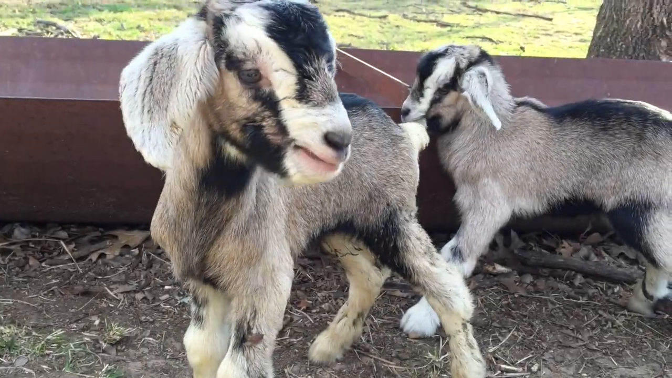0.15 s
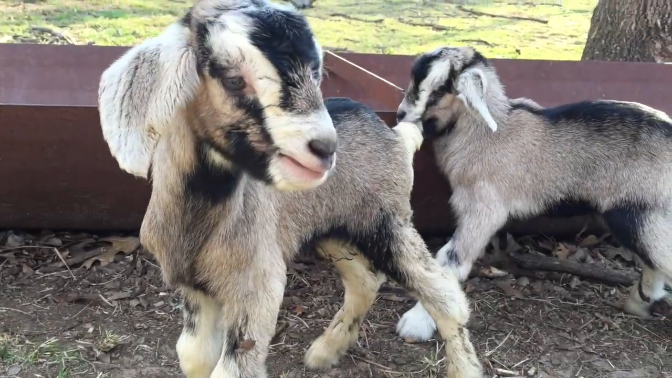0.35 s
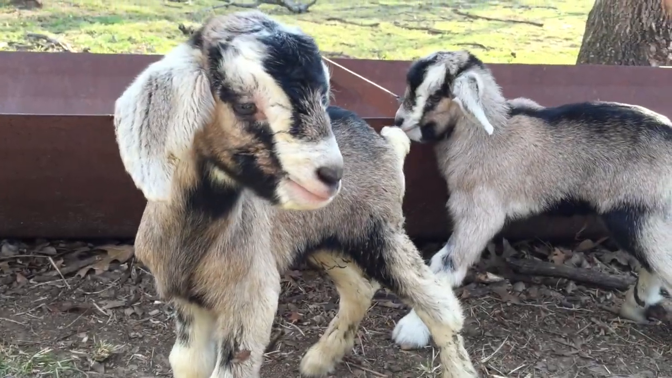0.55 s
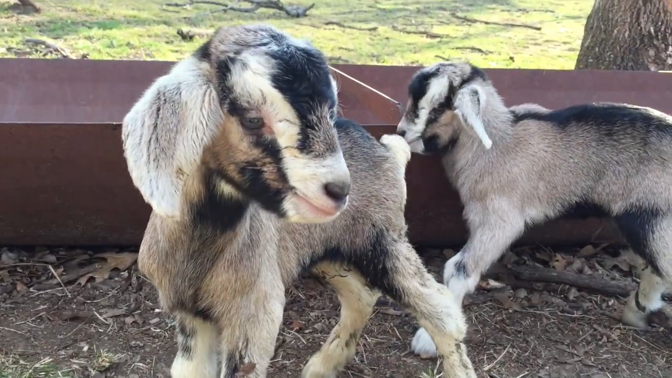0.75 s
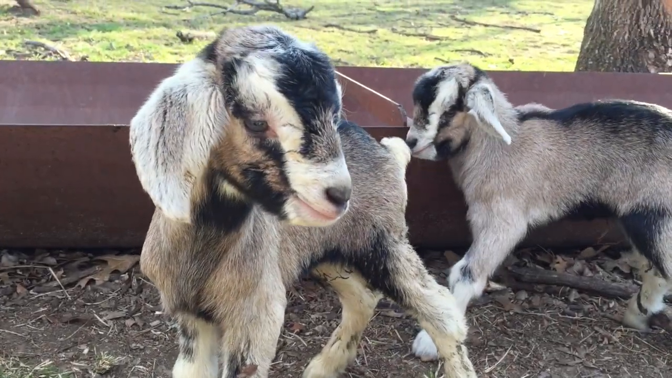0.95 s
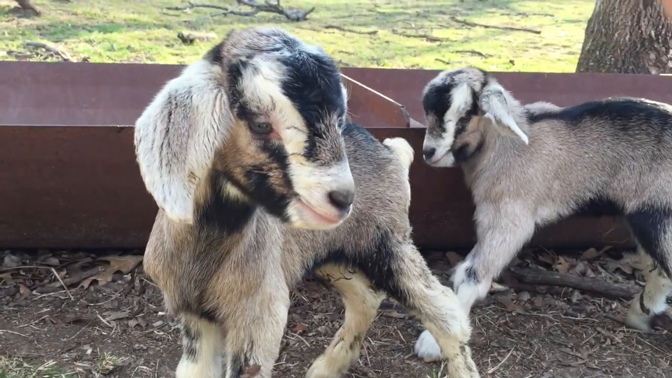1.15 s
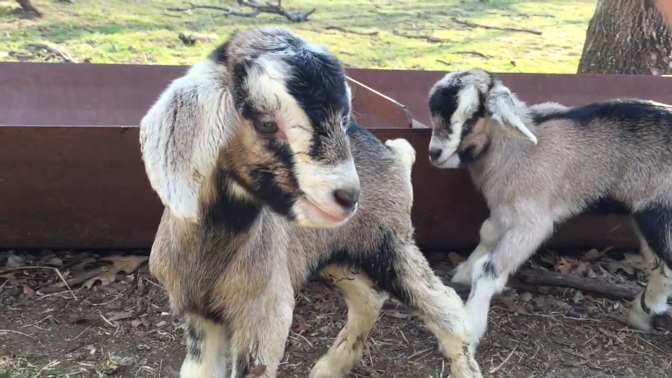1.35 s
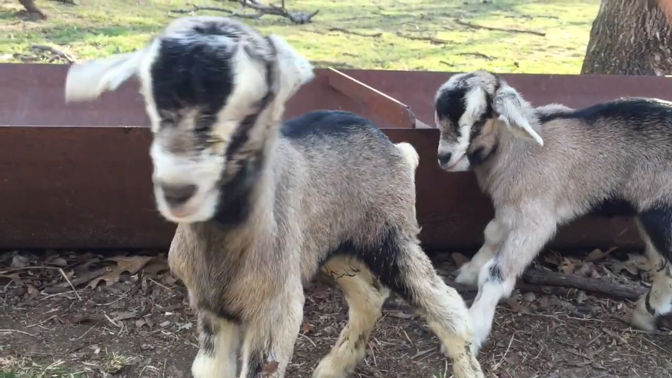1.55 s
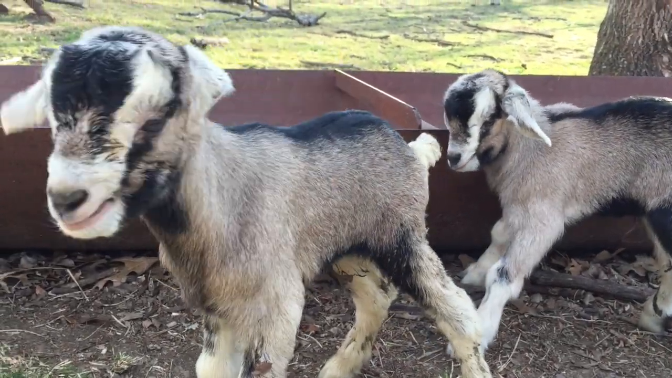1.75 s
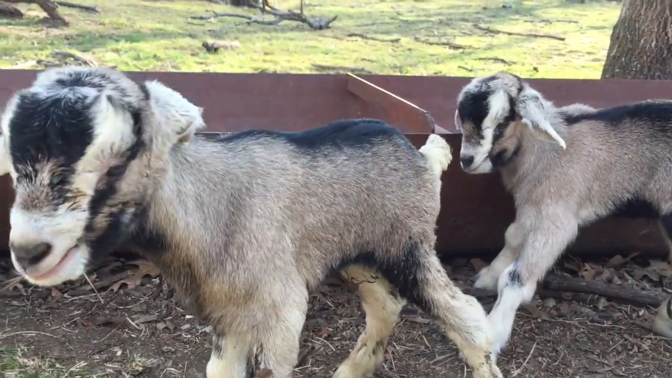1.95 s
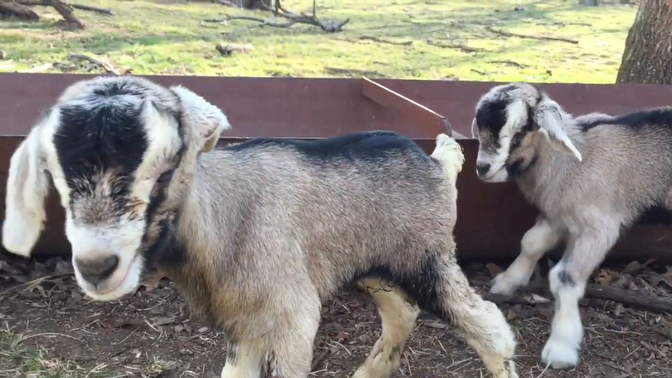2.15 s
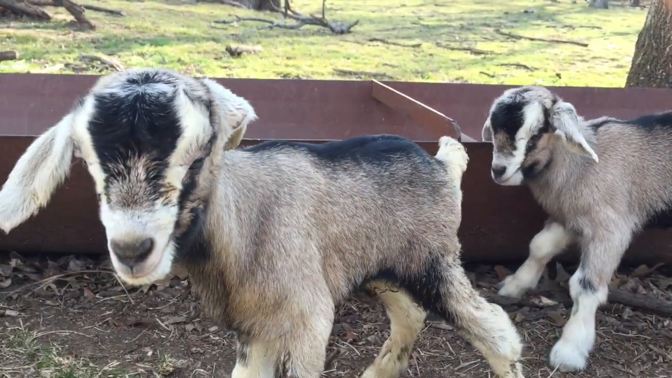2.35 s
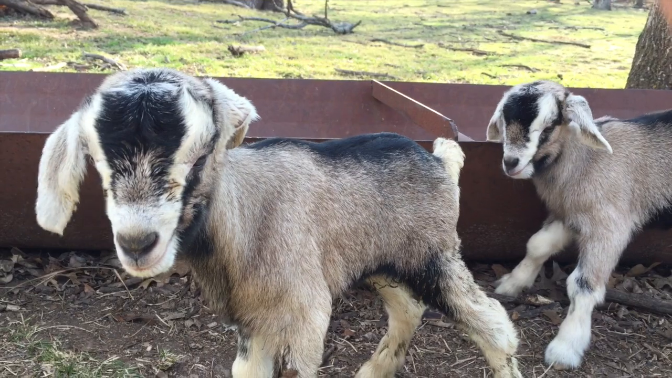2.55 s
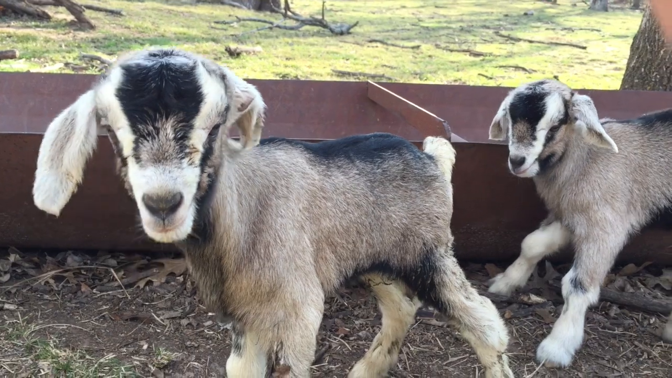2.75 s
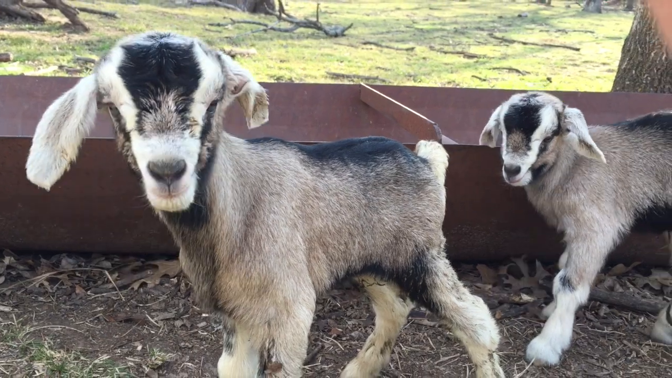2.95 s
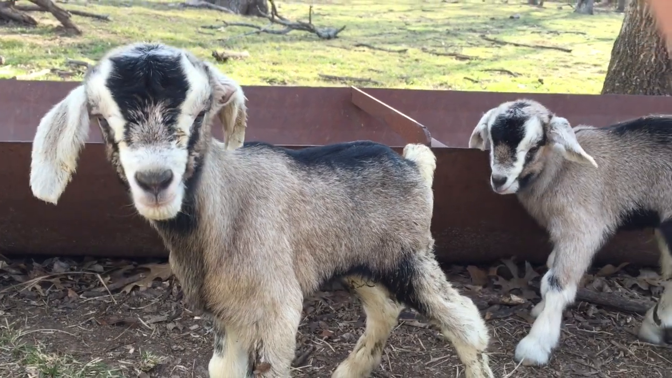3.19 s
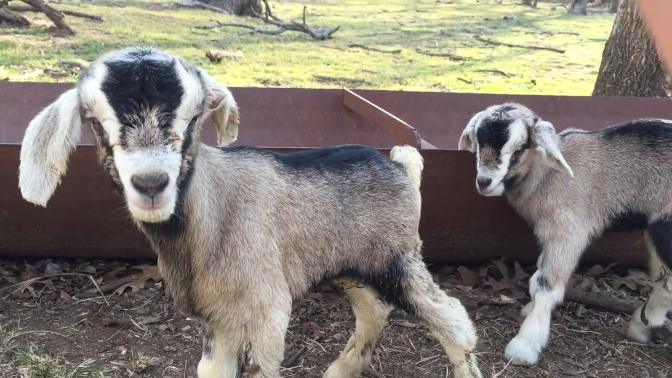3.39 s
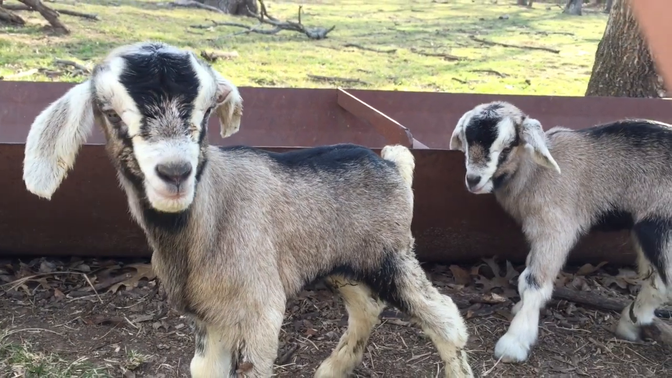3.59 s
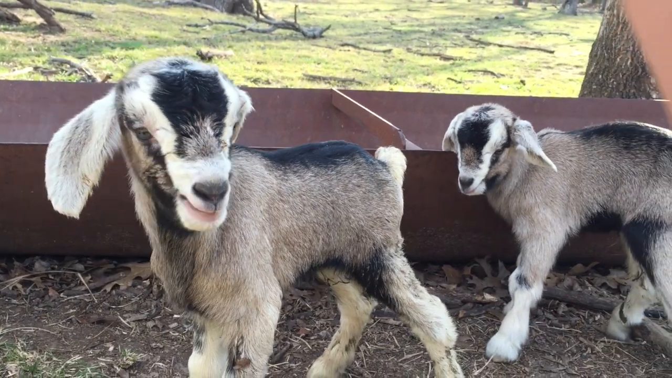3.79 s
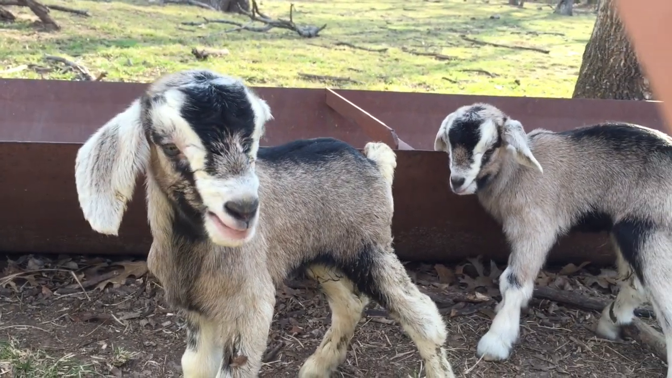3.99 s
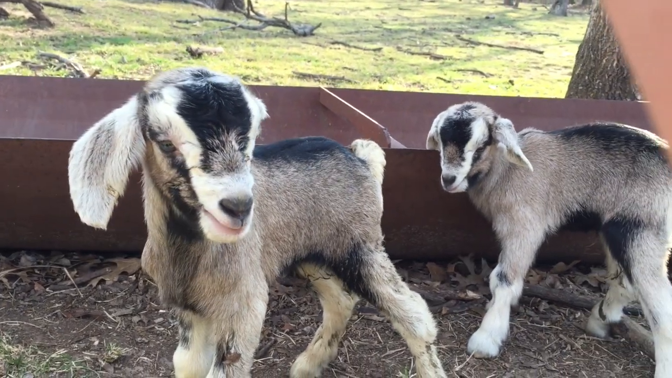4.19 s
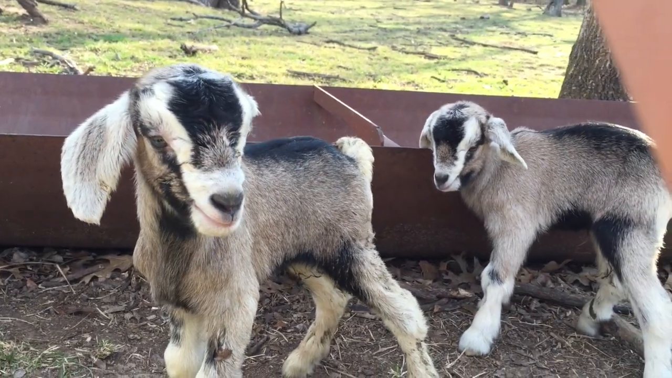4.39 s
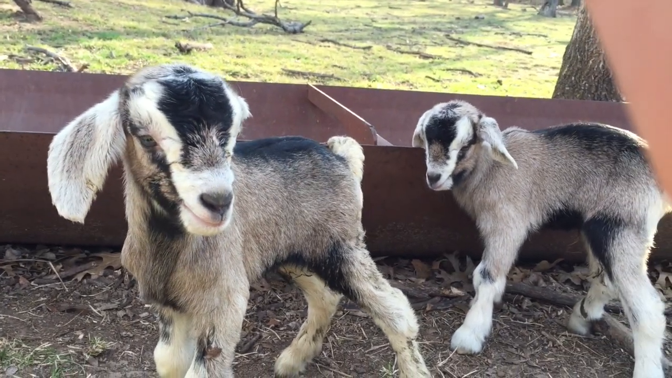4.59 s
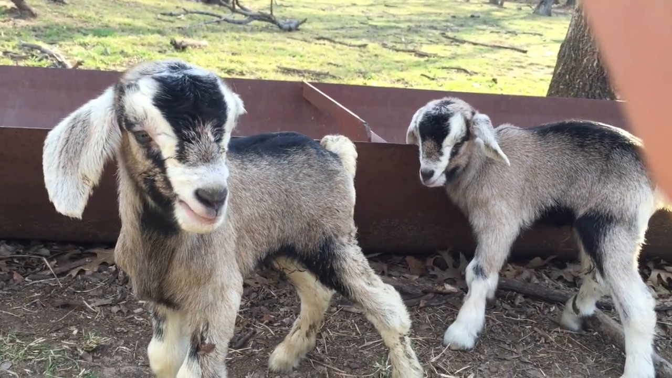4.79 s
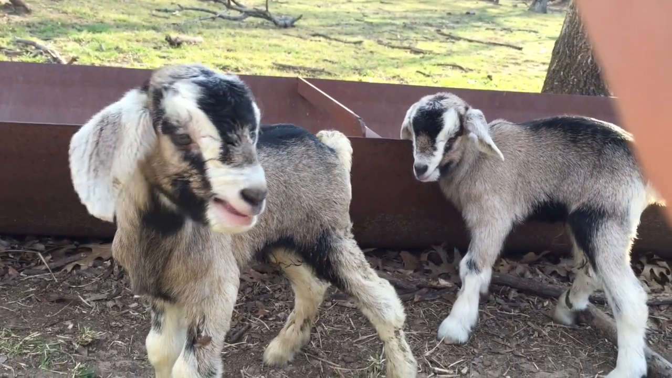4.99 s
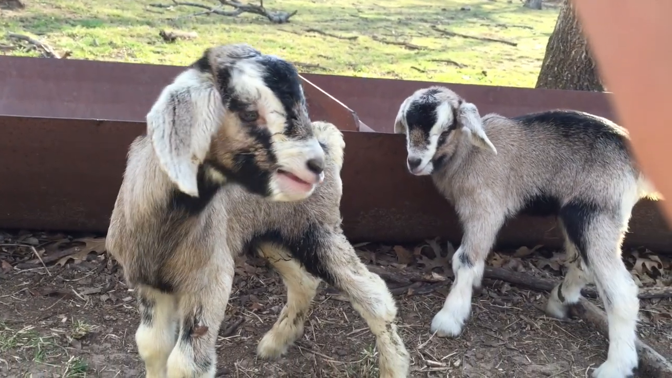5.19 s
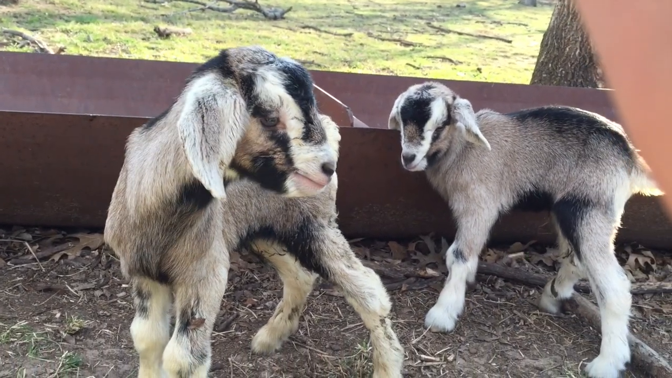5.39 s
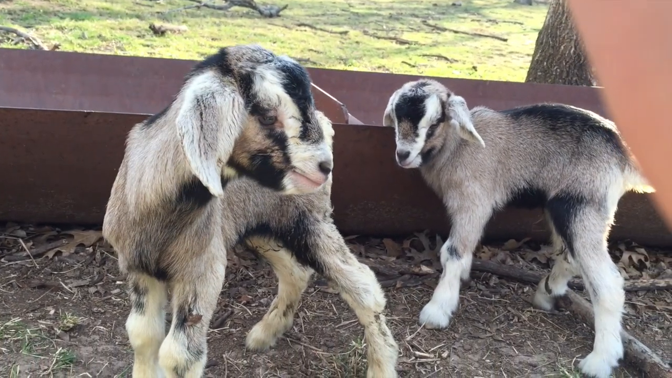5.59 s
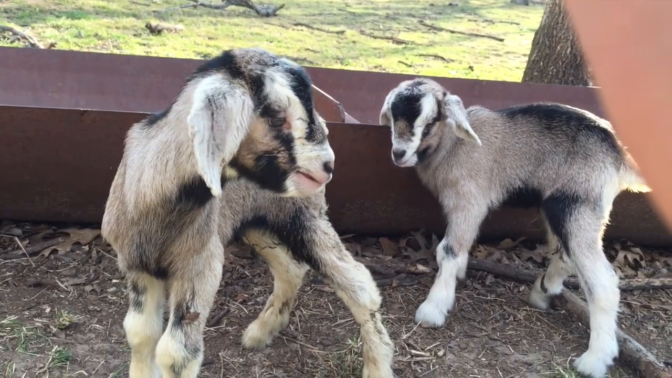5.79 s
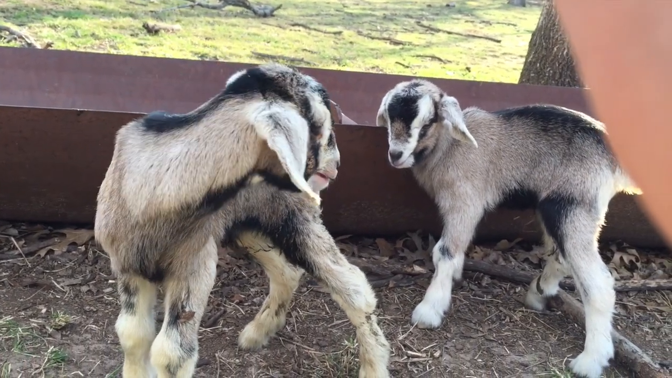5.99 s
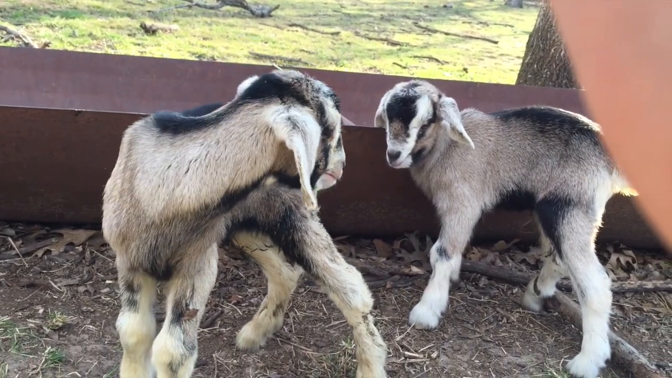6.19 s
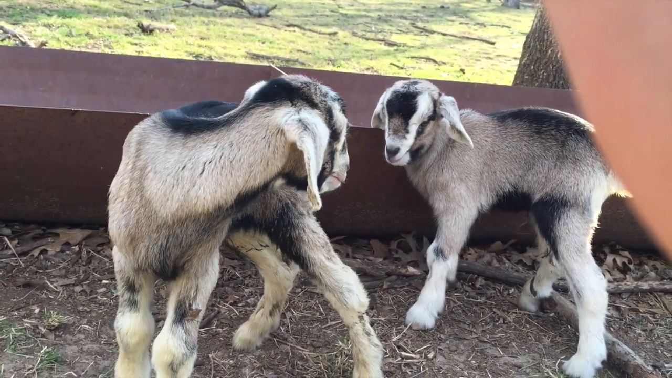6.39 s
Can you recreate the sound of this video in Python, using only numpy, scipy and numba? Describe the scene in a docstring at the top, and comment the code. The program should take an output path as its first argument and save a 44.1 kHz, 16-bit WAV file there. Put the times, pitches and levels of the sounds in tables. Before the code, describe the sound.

A calm open farmyard, close single microphone, faint low background noise throughout. At 0 s a young goat is already bleating nearby, a nasal mid-high cry shaking about ten times a second until 0.45 s. Far off, a clear rooster crows from 0.2 to 0.8 s, ringing on through the yard, while a hoarser one sounds two notes between 0.5 and 1.4 s. A small lip pop opens the second, slightly softer bleat, 1.55 to 2.05 s. Tiny bird chirps follow from 2.1 to 2.5 s, then dry litter crackles under a hoof near 3 s. A second kid calls softly in breathy throbs, 3.1 to 3.6 s. The loudest, brightest bleat runs 3.7 to 4.35 s, another strong one 4.8 to 5.35 s, and a weaker, airier one 5.75 to 6.15 s. Soft low wind puffs touch the microphone, mostly after 3 s, until the end.

```python
"""A newborn goat bleats close by, five times in all: pulsed vocal folds ring the resonances of mouth and throat.
Its chest shakes about ten times a second, so pitch, loudness and brightness waver together.
A second kid calls softly in breathy throbs; far off, two roosters crow as beak resonances over folds.
Filtered noise grains are hooves in dry litter, short sines are a small bird's chirps,
and noise bands make the farmyard bed and the light wind puffs on the single microphone."""
import sys
import numpy as np
from scipy import signal
from scipy.io import wavfile
from scipy.ndimage import uniform_filter1d, map_coordinates
from numba import njit

SR = 44100
rng = np.random.default_rng(int(sys.argv[2]) if len(sys.argv) > 2 else 0)


def pcm_store(signal):
    """Save signal as 16-bit PCM."""
    levels = np.round(np.clip(np.atleast_2d(signal), -1, 1) * 32767)
    wavfile.write(sys.argv[1], SR, levels.astype(np.int16).T)


def level_to_linear(level):
    """Convert decibel levels to linear amplitude factors, elementwise."""
    exponent = np.asarray(level, float) / 20
    return 10 ** exponent


N = 284004
TIME = np.arange(N) / SR

# farmyard noise colour, before the bed is set to its level: (f/Hz, level/dB per Hz)
YARD_COLOUR = [(59, -32), (100, 4.5), (214, 1), (541, -17.5), (977, -8.5), (1880, -19), (2180, -19),
               (2370, -19), (3180, -21), (4860, -30.5), (15500, -37.5)]
# wind puffs: (t/s, length/s, level/dB)
WIND_PUFFS = [(0.026, 0.12, -66), (0.897, 0.19, -69), (3.187, 0.082, -56), (3.425, 0.14, -64),
              (3.752, 0.13, -56), (3.92, .14, -49.5), (4.16, 0.044, -66), (4.345, 0.099, -55),
              (4.675, .08, -52.5), (5.951, .07, -60.5), (6.118, 0.13, -51), (6.323, 0.086, -51)]
# clear rooster, before the yard rings: (t/s, pitch f/Hz, level/dB)
CLEAR_CROW_GLIDE = [(.2, 633.5, -63), (.42, 623.6, -57), (.554, 626, -57), (.65, 618, -54.5),
                    (.72, 600.4, -60), (.77, 579, -65), (.8, 570, -78.5)]
# its beak resonances: (f/Hz, width/Hz, relative level/dB)
CLEAR_CROW_BEAK = [(1240, 150, 6.5), (1720, 260, 5), (2380, 530, 1.5), (3060, 410, 8.5), (4110, 700, 5),
                   (5670, 3200, -17.5)]
# hoarse rooster, one list a note, before the echo: (t/s, pitch f/Hz, level/dB)
HOARSE_CROW_NOTES = [
    [(.5, 513, -59), (.57, 526, -59.5), (.7, 490, -62), (.8, 496, -67), (.84, 514, -72)],
    [(.93, 551, -61), (.96, 628, -54), (1.0, 627.5, -54.5), (1.06, 594, -57), (1.14, 566, -61.5),
     (1.21, 568, -66), (1.24, 495.6, -59.5), (1.27, 475, -59.5), (1.34, 490, -69), (1.38, 486, -62)],
]
# its beak resonances, one list a note: (f/Hz, width/Hz, relative level/dB)
HOARSE_CROW_BEAKS = [
    [(1300, 130, 1), (1500, 720, -4.5), (2220, 410, -14)],
    [(1200, 230, 1.5), (1588, 115, 6.5), (2860, 530, -17)],
]
# bird chirps, before the echo: (t/s, peak level/dB, f/Hz)
BIRD_CHIRPS = [(2.0877, -71, 3390), (2.1306, -70, 3310), (2.1721, -74, 3290), (2.3048, -69, 3340),
               (2.3611, -81, 3420), (2.3851, -84, 3370), (2.4489, -77, 3100), (2.5003, -75, 3250)]
# hooves in dry litter, before the fades: (t/s, length/s, centre f/Hz, width/Hz, level/dB)
HOOF_SCUFFS = [(0.761, 0.04, 6500, 3000, -70), (1.38, 0.077, 9000, 9000, -71),
               (2.219, 0.023, 7050, 6050, -72.5), (2.817, .01, 12000, 6060, -72),
               (2.823, 0.084, 8100, 9000, -70), (2.904, .008, 12000, 6950, -70.5),
               (2.945, .008, 12000, 7000, -77), (2.974, 0.03, 5770, 9000, -59),
               (2.988, 0.036, 3270, 9000, -54.5), (3.035, 0.013, 10000, 7000, -74),
               (3.184, 0.011, 3000, 5000, -65)]
# second kid, one row a throb, before fades and echo:
# (t/s, length/s, start pitch f/Hz, end pitch f/Hz, level/dB, breathiness 0-1)
KID_THROBS = [(3.108, 0.065, 469, 445, -52, 0.91), (3.211, 0.074, 493, 490, -52, 0.13),
              (3.311, 0.082, 505, 482, -49.5, 0), (3.422, 0.079, 515, 468, -49.5, 0.1),
              (3.588, 0.0094, 457, 444, -56.5, 0.9)]
# its throat resonances: (f/Hz, width/Hz, relative level/dB)
KID_RESONANCES = [(490, 320, -11), (1040, 72, -10.5), (1395, 320, 1), (2000, 240, -18.5), (3910, 360, -9.5),
                  (5120, 590, -8.5), (6500, 400, -21), (9000, 1200, -33), (11700, 1000, -34)]
# its leak of breath: (t/s, level/dB)
KID_LEAK = [(3.11, -92), (3.14, -68), (3.2, -63), (3.3, -69), (3.41, -65), (3.5, -70), (3.57, -74),
            (3.6, -69)]
# goat: each shake of the chest is a push of air; crests, one list a bleat, before hang, drop and slam:
# (t/s, pitch f/Hz, level/dB)
PUSH_CRESTS = [
    [(.008, 422.2, -37), (.105, 450.8, -28), (.198, 469.7, -24), (.295, 460, -25), (.399, 422.7, -29.5)],
    [(1.58, 409.1, -31.5), (1.678, 407.8, -31.5), (1.768, 442.8, -27), (1.862, 448, -26),
     (1.964, 442, -27.5)],
    [(3.721, 475.2, -24), (3.806, 507.5, -19), (3.896, 509.3, -19), (3.99, 497.2, -19.5),
     (4.086, 480.4, -23.5), (4.186, 465, -26.5), (4.288, 388.3, -33)],
    [(4.808, 437.2, -30), (4.902, 474, -21), (4.996, 491.4, -21), (5.086, 498.7, -22),
     (5.179, 494.6, -23.5), (5.28, 486, -26)],
    [(5.79, 419.7, -39), (5.887, 460.4, -31), (5.987, 467.8, -31.5), (6.083, 466, -30)],
]
# slack between the pushes; the first row starts the bleat, the last ends it: (t/s, pitch f/Hz, level/dB)
PUSH_DIPS = [
    [(-.04, 330, -24), (.057, 273.7, -40.5), (.151, 279, -34), (.247, 277, -35.5), (.348, 247.5, -40.5),
     (.465, 230.5, -42)],
    [(1.556, 386.5, -37), (1.634, 228.4, -40.5), (1.72, 262.9, -37.5), (1.817, 284.6, -35.5),
     (1.914, 299.2, -37), (2.045, 216.4, -45)],
    [(3.685, 416.2, -36), (3.753, 395.3, -31), (3.842, 432.2, -24.5), (3.94, 409.9, -29.5),
     (4.035, 361, -33.5), (4.139, 291.2, -37), (4.246, 282, -38.5), (4.34, 289, -37.5)],
    [(4.778, 406, -45), (4.85, 367, -35), (4.942, 375, -30.5), (5.036, 413, -28.5), (5.124, 387.4, -32),
     (5.22, 394, -35), (5.338, 288, -40.5)],
    [(5.755, 317.5, -49.5), (5.827, 292.1, -44), (5.939, 307.3, -41), (6.037, 316.5, -41.5),
     (6.138, 284.3, -50.5)],
]
# how pointed the crests are, a row a bleat, 1 = round:
# (pitch rising, pitch falling, level rising, level falling)
CREST_POINTS = [(1.1, 1, 1.18, 1.5), (1.4, 1.2, 1.22, 1.38), (1.1, 1.1, 0.85, 1.19), (1.1, 1.1, 1.07, 1.8),
                (1.3, 0.76, 1.3, 0.95)]
# low partials and treble against the mouth band, a row a bleat, before the pressing of the folds:
# (low at crests level/dB, low in dips level/dB, treble at crests level/dB, treble in dips level/dB)
BAND_BALANCE = [(-12.5, -14.5, -25.5, -43), (-12, -14.5, -23, -43), (-13, -23, -19, -31.5),
                (-14, -25, -19.5, -32), (-13, -15, -22.5, -39.5)]
# the jaw moves through a bleat, a row a bleat: (first resonance start f/Hz, middle f/Hz, end f/Hz,
# second resonance f/Hz, third start f/Hz, third end f/Hz); the pushes then bend the third
JAW_MOVES = [(1200, 1184, 1230, 2100, 3670, 4150), (1065, 1140, 1390, 2210, 3770, 4030),
             (1000, 1400, 1250, 2280, 3540, 4070), (1100, 1504, 1425, 2600, 3710, 3810),
             (1200, 1440, 1670, 2680, 3400, 3910)]
# the head turns between bleats, a row a bleat: relative (second resonance level/dB, third level/dB,
# fourth level/dB, octave partial re fundamental level/dB, topmost resonances level/dB)
HEAD_TURNS = [(-8, -6, -21.5, 5, -9.5), (-7.5, -7.5, -25.5, 3.5, -4), (-12.5, -7, -18, 5, -14.5),
              (-14, -7, -19.5, 6.5, -13.5), (-11.5, -5, -25.5, 11.5, -2)]
# mouth resonance widths, before open folds damp the first: (first/Hz, second/Hz, third/Hz, fourth/Hz)
MOUTH_WIDTHS = (175, 1055, 415.7, 1435)
# upper throat resonances: (f/Hz, width/Hz, relative level/dB)
THROAT_RESONANCES = [(8260, 1700, 4), (10200, 370, -4.5)]
# bands swallowed by side pockets: (f/Hz, width/Hz, depth 0-1)
SWALLOWED_BANDS = [(4840, 50, 0.9), (6820, 360, 0.6)]
# gain of air noise against the fold pulses, one value a bleat
BLEAT_AIR = (.19, .18, .07, .06, .17)
# windpipe resonance while the folds are open: (f/Hz, width/Hz, level/dB, extra level at a full push/dB)
WINDPIPE_MODE = (3394.5, 302.5, -17.5, 6)
# pressed folds lose the low partials after each crest: (delay/s, width/s, level change/dB)
PRESSED_FOLDS = (0.018, 0.0061, -5.5)
# slamming folds cut the level after each crest: (delay/s, cut/s, recovery/s)
SLAM_TIMES = (.017, 0.0033, 0.0085)
# how deep that cut goes, one value a bleat: (level change/dB)
SLAM_DEPTHS = (-5, -4.5, -4.5, -5.5, -1)
# lip pops, before fades and echo: (t/s, f/Hz, peak level/dB)
LIP_POP_ROWS = [(1.543, 700, -26), (1.56, 1300, -30), (3.684, 760, -24), (4.771, 770, -29),
                (4.782, 1200, -28.5), (5.752, 673, -29.5)]


@njit
def sweep(x, hz, width):
    """State-variable band-pass with moving centre and width, gain 1 at the centre."""
    y, b, l = np.empty(len(x)), 0., 0.
    for i in range(len(x)):
        g, k = np.tan(np.pi * hz[i] / SR), width[i] / hz[i]
        v = (b + g * (x[i] - l)) / (1 + g * (g + k))
        b, l, y[i] = 2 * v - b, l + 2 * g * v, k * v
    return y


def svf(x, hz, width):
    """The band-pass for fixed or moving settings."""
    return sweep(x, hz + np.zeros(len(x)), width + np.zeros(len(x)))


def level(x, db):
    """Set the rms level."""
    return x * level_to_linear(db) / np.sqrt(np.mean(x ** 2))


def walk(n, rate):
    """Random levels held 1 / rate s and slewed twice; spread near 1."""
    k = int(SR / rate)
    steps = np.repeat(rng.standard_normal(n // k + 1), k)
    return 1.75 * uniform_filter1d(uniform_filter1d(steps, k), k)[:n]


def tract(x, modes):
    """Parallel resonances of alternating sign, as in a tube."""
    return sum((-1) ** k * level_to_linear(db) * svf(x, hz, w) for k, (hz, w, db) in enumerate(modes))


def steep(x, modes):
    """Each resonance applied twice, so the valleys between them stay dark."""
    return sum(level_to_linear(db) * svf(svf(x, hz, w), hz, w) for hz, w, db in modes)


def glide(rows):
    """First sample and smooth columns through the rows."""
    s, *columns = np.array(rows, float).T
    first = max(int(s[0] * SR), 0)
    place = np.interp(TIME[first:int(s[-1] * SR)], s, np.arange(len(s)))
    return first, [map_coordinates(c, [place], order=3, mode="nearest") for c in columns]


def add(out, first, x, fade=0.0015):
    """Mix a sound in with short fades; one that starts at the first sample keeps its onset."""
    edge = np.minimum(np.arange(len(x)) + SR * (first == 0), np.arange(len(x))[::-1])
    out[first:first + len(x)] += (x * np.clip(edge / (fade * SR), 0, 1))[:N - first]


def echo(x, t60, damp_hz, db):
    """Scattered returns from trough, fence and trees: a decaying, dulled noise tail."""
    t = TIME[:int(t60 * SR)]
    tail = rng.standard_normal(len(t)) * np.exp(-np.log(1000) * t / t60) * (t > .003)
    tail = signal.sosfilt(signal.butter(1, damp_hz, fs=SR, output="sos"), tail)
    return x + level_to_linear(db) * signal.fftconvolve(x, tail / np.sqrt(np.sum(tail ** 2)))[:N]


def folds(hz, jitter, breath, shimmer_db):
    """Vocal folds: phase, and one sharp pulse a cycle with a puff of air while they are open."""
    top_hz = SR / 2.6
    phase = 2 * np.pi * np.cumsum(hz * (1 + jitter * walk(len(hz), 300))) / SR
    pulses = sum(np.cos(k * phase) * (k * hz < top_hz) for k in range(1, 60))
    pulses = pulses * np.sqrt(2 * hz / top_hz)  # even power at any pitch
    air = (1 + 0.39 * np.cos(phase)) * rng.standard_normal(len(hz))
    return phase, level_to_linear(shimmer_db * walk(len(hz), 199.9)) * pulses + breath * air


def yard():
    """Distant farm noise in half-octave bands that flicker a little."""
    out, swell_db = 0, 0.45 * walk(N, 0.44)
    hz_points, db_points = np.transpose(YARD_COLOUR)
    for hz in 110 * 2 ** np.arange(0, 7.3, .5):
        band = svf(svf(rng.standard_normal(N), hz, hz / 2), hz, hz / 2)
        colour_db = np.interp(np.log(hz), np.log(hz_points), db_points)
        out = out + level_to_linear(colour_db + swell_db + 0.51 * walk(N, 3.2)) * band
    return level(out, -61.5)


def wind():
    """Light wind on the microphone: low rumble in a wandering breeze and bell-shaped puffs."""
    breeze_db = -69 + 2.1 * walk(N, 9.4)
    rumble = svf(svf(rng.standard_normal(N), 64., 45.), 65.0, 67.0)
    gusts = level_to_linear(breeze_db)
    for s, length, db in WIND_PUFFS:
        gusts = gusts + level_to_linear(db) * np.exp(-2 * ((TIME - s) / (length / 2)) ** 2)
    return gusts * level(rumble, 0)


def clear_crow():
    """One clear crow with a tall stack of partials; the yard holds it long after."""
    out = np.zeros(N)
    first, (hz, db) = glide(CLEAR_CROW_GLIDE)
    source = folds(hz, jitter=.004, breath=.3, shimmer_db=2)[1]
    add(out, first, level_to_linear(db) * level(tract(source, CLEAR_CROW_BEAK), 0))
    return echo(out, t60=1.05, damp_hz=3485, db=-3.0)


def hoarse_crow():
    """One hoarse crow of two notes: unsteady, airy folds through steep beak resonances."""
    out = np.zeros(N)
    for rows, beak, breath in zip(HOARSE_CROW_NOTES, HOARSE_CROW_BEAKS, (.9, .35)):
        first, (hz, db) = glide(rows)
        source = folds(hz, jitter=.02, breath=breath, shimmer_db=1.5)[1]
        add(out, first, level_to_linear(db) * level(steep(source, beak), 0))
    return out


def bird():
    """Short pure chirps, each a sine swelling and fading."""
    out, t = np.zeros(N), TIME[:int(.022 * SR)]
    for s, db, hz in BIRD_CHIRPS:
        add(out, int(s * SR), level_to_linear(db) * np.hanning(len(t)) * np.sin(2 * np.pi * hz * t))
    return out


def litter():
    """Dense crackle of dry leaves under a hoof: noise of jumpy level in a wide band."""
    out = np.zeros(N)
    for s, length, hz, width, db in HOOF_SCUFFS:
        n = int(length * SR)
        grains = rng.standard_normal(n) * level_to_linear(3 * walk(n, 900))
        add(out, int(s * SR), level(svf(grains, 1. * hz, 1. * width), db), fade=length / 4)
    return out


def kid():
    """Soft throbs, each sliding down, over a leak of breath."""
    out = np.zeros(N)
    for s, length, start_hz, end_hz, db, breathy in KID_THROBS:
        hz = np.linspace(start_hz, end_hz, int(length * SR))
        source = folds(hz, jitter=.004 + .05 * breathy ** 2, breath=2 * breathy, shimmer_db=1)[1]
        throb = level(steep(source, KID_RESONANCES), db)
        add(out, int(s * SR), throb * np.hanning(len(hz)) ** 0.5)
    first, (db,) = glide(KID_LEAK)
    leak = steep(rng.standard_normal(len(db)), KID_RESONANCES[3:])
    add(out, first, level_to_linear(db) * level(leak, 0))
    return out


def waver(t, knots, crests, dips, rising, falling):
    """Swing from each dip up to its crest and down to the next dip."""
    place = np.interp(t, knots, np.arange(len(knots)) - 1e-9).clip(0)
    k = place.astype(int)
    up = k % 2 == 0
    swing = (1 - np.cos(np.pi * place)) / 2
    dip = np.broadcast_to(dips, len(knots) // 2 + 1)[(k + 1) // 2]
    crest = np.broadcast_to(crests, len(knots) // 2)[k // 2]
    return dip + (crest - dip) * swing ** np.where(up, rising, falling)


def after_crests(t, crests_s, delay, width, change):
    """A brief bell-shaped change, offset by the delay from every crest."""
    return change * np.exp(-((t[:, None] - crests_s - delay) / width) ** 2 / 2).sum(axis=1)


def slams(t, crests_s, delay, cut, recovery):
    """Folds slamming shut: a sudden step after every crest that heals slowly."""
    late = t[:, None] - crests_s - delay
    return ((1 + np.tanh(late / cut)) / 2 * np.exp(-late.clip(0) / recovery)).sum(axis=1)


def effort(crests, dips, pointed, balance, slam_db):
    """First sample, pitch, level, low partials and treble of one bleat, all moved by its pushes."""
    (s, hz, db), (dip_s, dip_hz, dip_db) = np.transpose(crests), np.transpose(dips)
    knots = np.sort(np.r_[s, dip_s])
    first = max(int(knots[0] * SR), 0)
    t = TIME[first:int(knots[-1] * SR)]
    pitch = waver(t, knots, hz, dip_hz, *pointed[:2])
    # the pitch (Hz) hangs back before each crest and drops as the folds slam
    pitch = pitch + after_crests(t, s, delay=-0.025, width=0.0087, change=-14)
    pitch = pitch + after_crests(t, s, delay=0.01847, width=.007, change=-16.5)
    level_lag_s = 0.0042
    mouth_db = waver(t - level_lag_s, knots, db, dip_db, *pointed[2:])
    mouth_db = mouth_db + slam_db * slams(t, s, *SLAM_TIMES)
    low_db = waver(t, knots, *balance[:2], 1.0, 0.56) + after_crests(t, s, *PRESSED_FOLDS)
    treble_db = waver(t, knots, *balance[2:], 1.0, 2.9)
    return first, pitch, mouth_db, low_db, treble_db


def mouth_band(source, hz, push, jaw, db2, db3):
    """Three mouth resonances and the windpipe, bent by the pushes of air."""
    start1, middle1, end1, hz2, start3, end3 = jaw
    # the upper resonances fade (dB) as a bleat runs out of air
    thin_db = -11 * np.exp(-TIME[:len(hz)][::-1] / 0.047)
    # wide-open folds damp the first resonance and pull the third down
    width1 = MOUTH_WIDTHS[0] * (1 + 0.21 * np.clip(push, 0, 1) ** 2)
    third_hz = np.linspace(start3, end3, len(hz)) - 120 * push
    # just past each crest the folds slam shut: the first resonance rings hardest, then cuts off
    closing = np.clip(-np.gradient(hz) * SR / 3000, 0, 1) * np.clip(2.0 * push + 0.52, 0, 1)
    first_hz = np.interp(np.linspace(0, 2, len(hz)), range(3), (start1, middle1, end1))
    mouth = tract(source, [(first_hz, width1, 1.4 * closing),
                           (hz2, MOUTH_WIDTHS[1], db2 + thin_db + 1.5 * push),
                           (third_hz, MOUTH_WIDTHS[2], db3 + thin_db)])
    pipe_hz, pipe_width, pipe_db, push_db = WINDPIPE_MODE
    mouth = mouth + steep(source, [(pipe_hz, pipe_width, pipe_db + push_db * push + thin_db)])
    # steep skirts: little leaks below the first or above the third resonance
    mouth = signal.sosfilt(signal.butter(2, 780, "highpass", fs=SR, output="sos"), mouth)
    return signal.sosfilt(signal.butter(8, 4600, fs=SR, output="sos"), mouth)


def lip_pops(out):
    """Lips part with a pop: a short cavity ring that dies in milliseconds."""
    ring = TIME[:int(.012 * SR)]
    for s, hz, db in LIP_POP_ROWS:
        pop = level_to_linear(db) * np.sin(2 * np.pi * hz * ring) * np.exp(-ring / .0025)
        add(out, int(s * SR), pop, fade=.002)


def goat():
    """Clear pulses ring mouth and throat; low partials swell on each push and thin when it is pressed."""
    out = np.zeros(N)
    for k, (jaw, head, breath) in enumerate(zip(JAW_MOVES, HEAD_TURNS, BLEAT_AIR)):
        db2, db3, db4, octave_db, top_db = head
        first, hz, db, low_db, treble_db = effort(
            PUSH_CRESTS[k], PUSH_DIPS[k], CREST_POINTS[k], BAND_BALANCE[k], SLAM_DEPTHS[k])
        # pitch above its running mean stands for the push of air, -1 to 1
        push = np.clip((hz - uniform_filter1d(hz, int(.1 * SR))) / 60, -1, 1)
        phase, source = folds(hz, jitter=.006, breath=breath, shimmer_db=.8)
        mouth = mouth_band(source, hz, push, jaw, db2, db3)
        airy = source + 0.41 * rng.standard_normal(len(hz))
        top = [(12800, 4300, top_db), (14850, 1900, top_db - 8.5)]
        fourth = level(steep(airy, [(6100, MOUTH_WIDTHS[3], 0)]), db4)
        treble = level(steep(airy, THROAT_RESONANCES + top), 0)
        # a small head radiates the fundamental poorly when the pitch sinks
        radiated = (hz / 460) ** 2.5
        octave = level_to_linear(octave_db) * np.cos(2 * phase - .3)
        low = np.sqrt(2) * (radiated * np.cos(phase - .8) + octave)
        # the fourth resonance follows a third of the treble's swing
        mouth = level(mouth, 0) + level_to_linear(0.33 * (treble_db - treble_db.mean())) * fourth
        for pocket_hz, width, depth in SWALLOWED_BANDS:
            mouth = mouth - depth * svf(mouth, pocket_hz, width)
        bleat = level_to_linear(db) * (mouth + level_to_linear(low_db) * low + level_to_linear(treble_db) * treble)
        add(out, first, bleat, fade=0.0045)
    lip_pops(out)
    return out


def scene():
    """Everything reaches one microphone, deaf to the lowest bass, laid on two equal channels."""
    far = echo(hoarse_crow() + bird(), t60=.3, damp_hz=4000, db=-4)
    near = echo(goat() + kid(), t60=0.089, damp_hz=3990, db=-15.0)
    mix = yard() + wind() + clear_crow() + far + litter() + near
    mix = signal.sosfilt(signal.butter(2, 34, "highpass", fs=SR, output="sos"), mix)
    return np.tile(mix, (2, 1))


def top_cut(x):
    """Nothing passes above the cut-off."""
    return signal.sosfilt(signal.butter(12, 15730, fs=SR, output="sos"), x)


def record(dry):
    """Pass on the finished mono microphone mix."""
    return top_cut(dry)


dry = scene()
out = record(dry)
pcm_store(out)
```